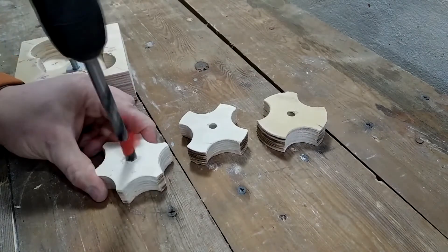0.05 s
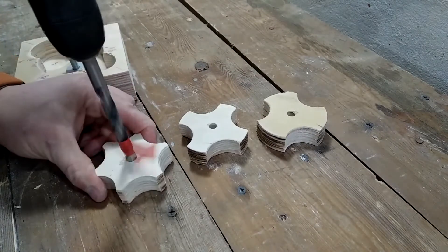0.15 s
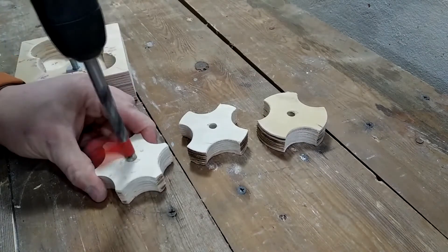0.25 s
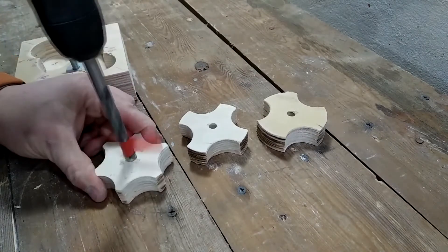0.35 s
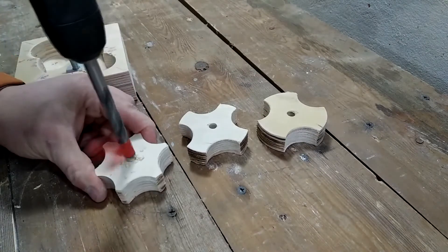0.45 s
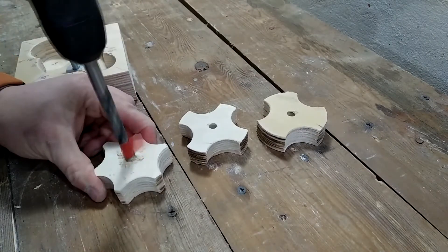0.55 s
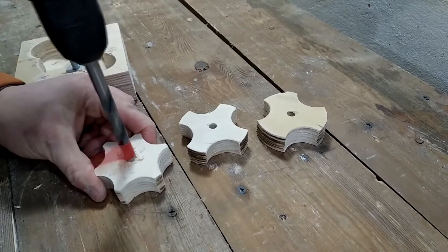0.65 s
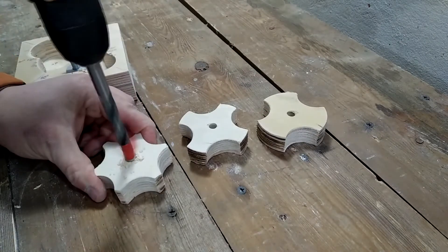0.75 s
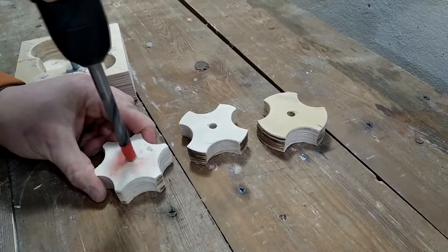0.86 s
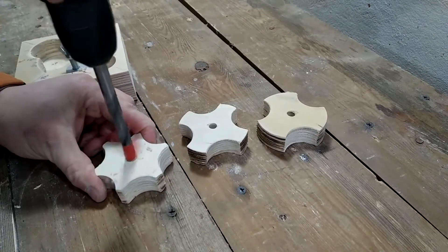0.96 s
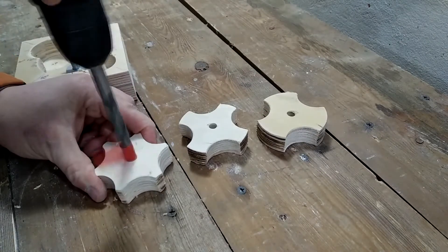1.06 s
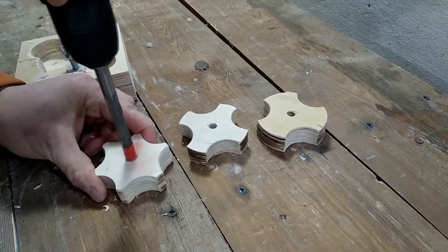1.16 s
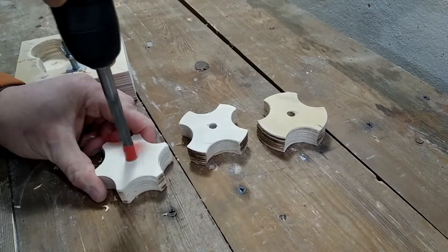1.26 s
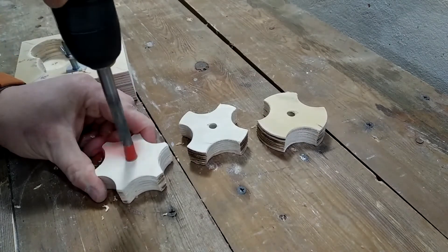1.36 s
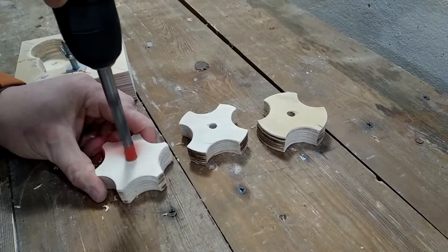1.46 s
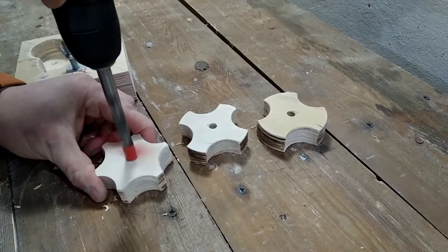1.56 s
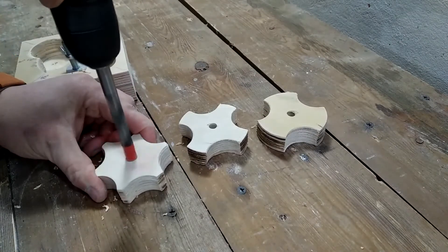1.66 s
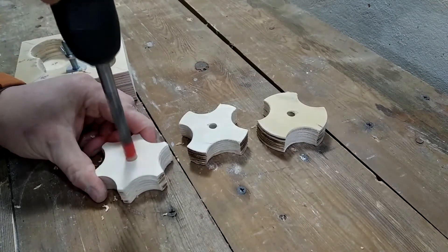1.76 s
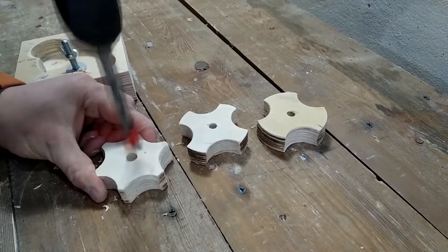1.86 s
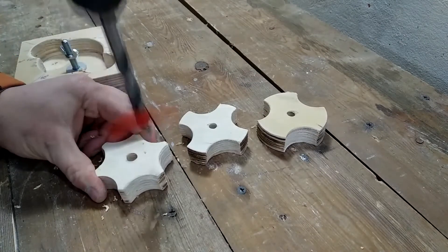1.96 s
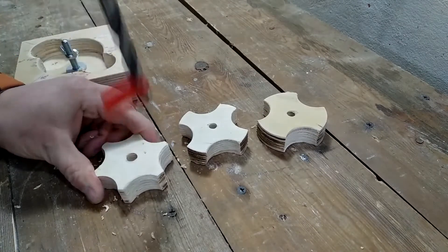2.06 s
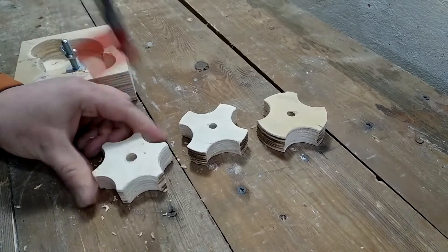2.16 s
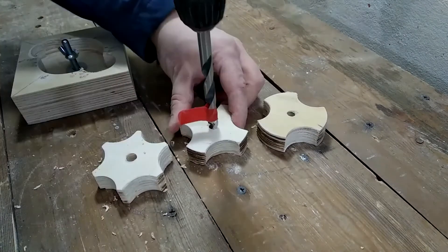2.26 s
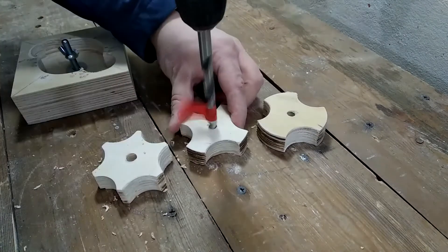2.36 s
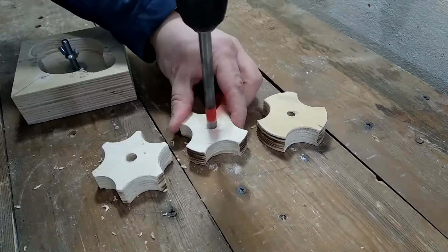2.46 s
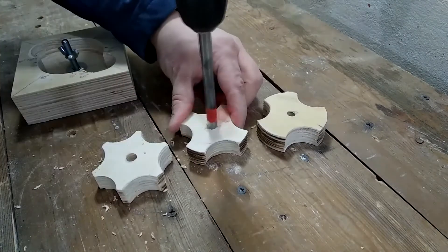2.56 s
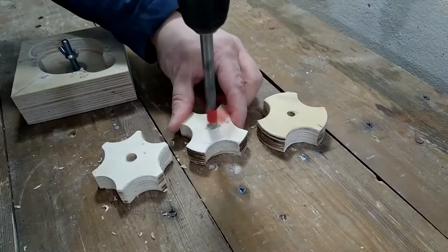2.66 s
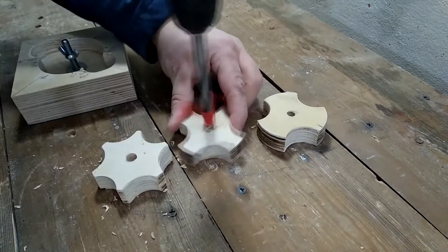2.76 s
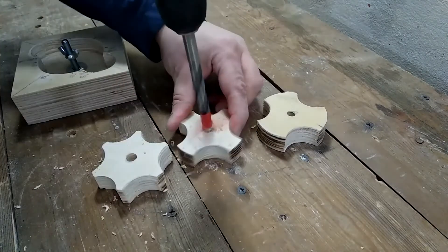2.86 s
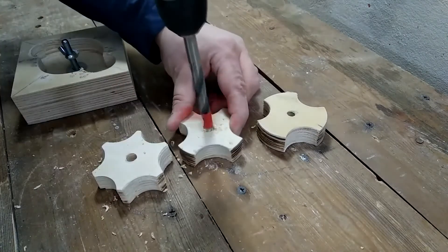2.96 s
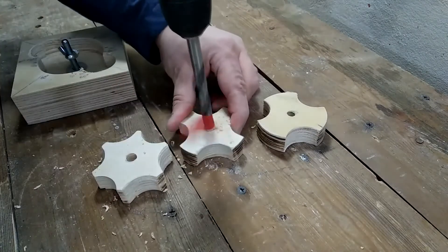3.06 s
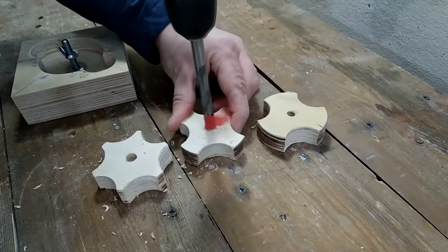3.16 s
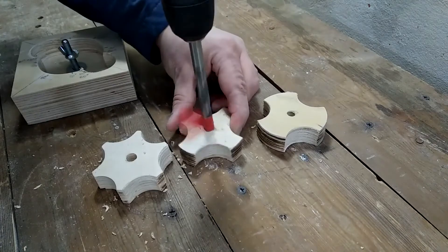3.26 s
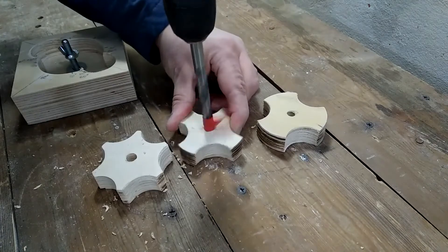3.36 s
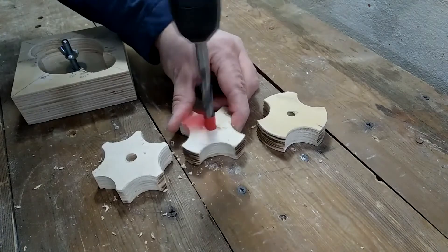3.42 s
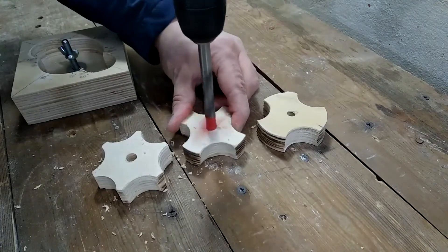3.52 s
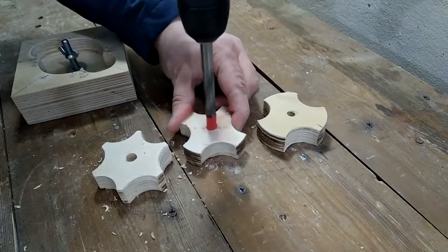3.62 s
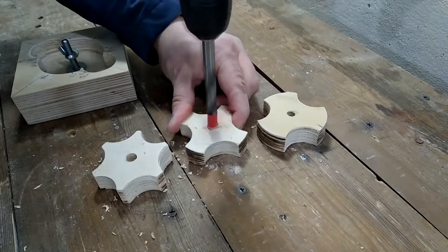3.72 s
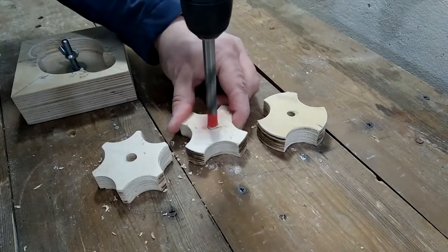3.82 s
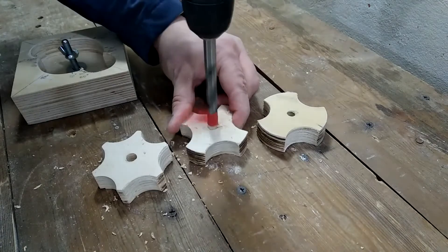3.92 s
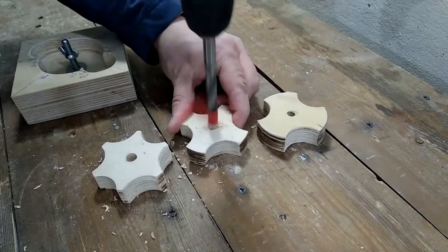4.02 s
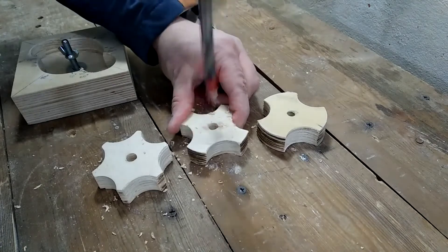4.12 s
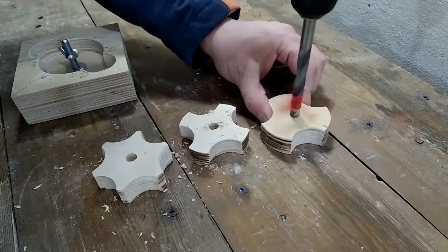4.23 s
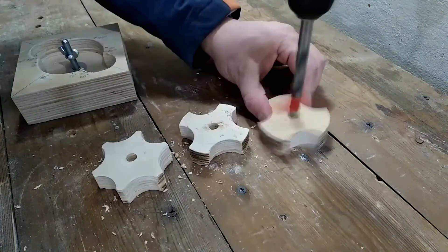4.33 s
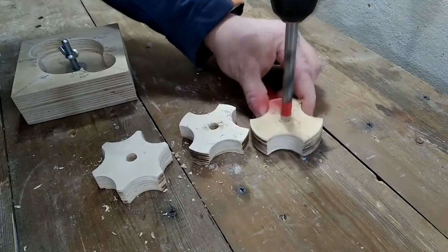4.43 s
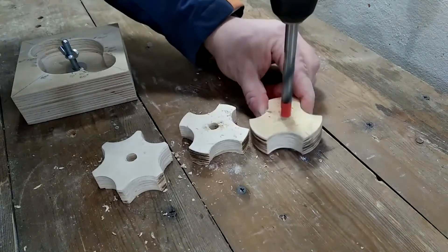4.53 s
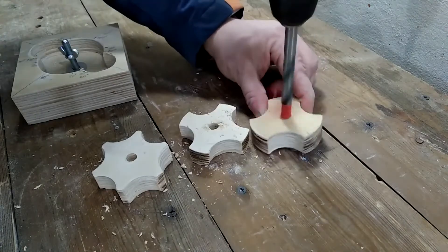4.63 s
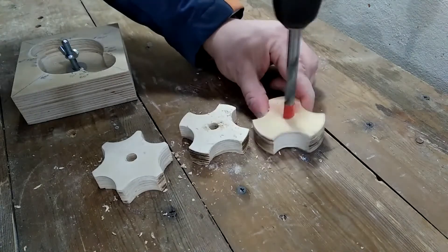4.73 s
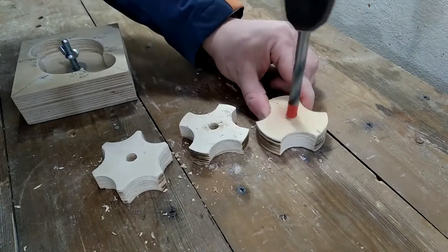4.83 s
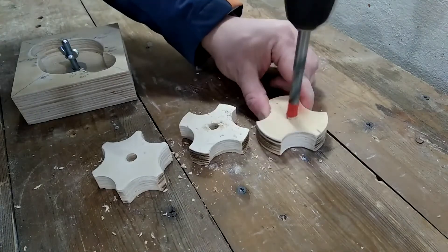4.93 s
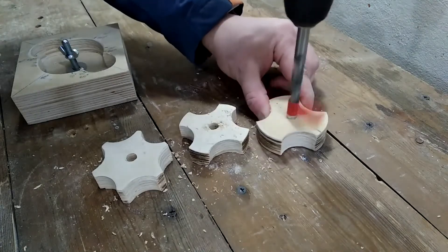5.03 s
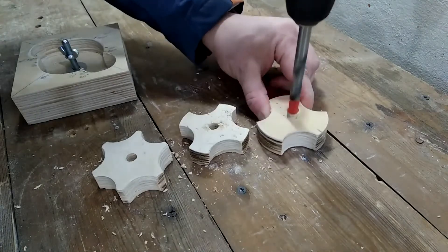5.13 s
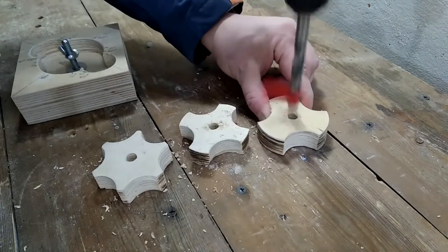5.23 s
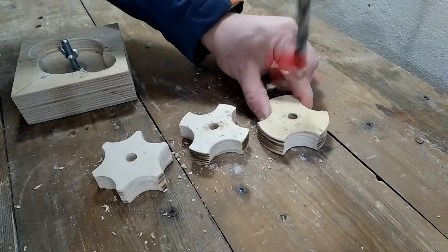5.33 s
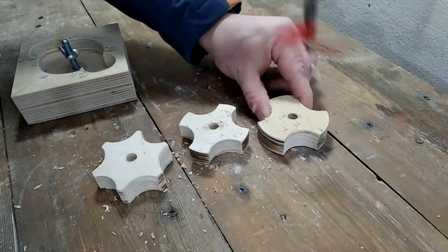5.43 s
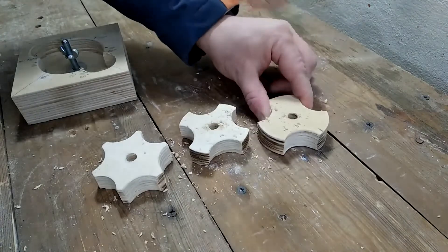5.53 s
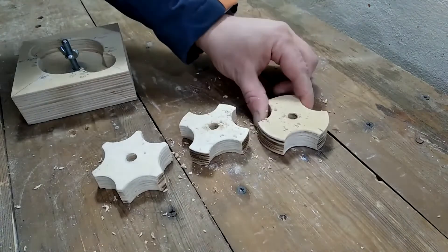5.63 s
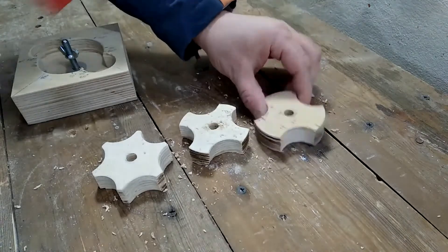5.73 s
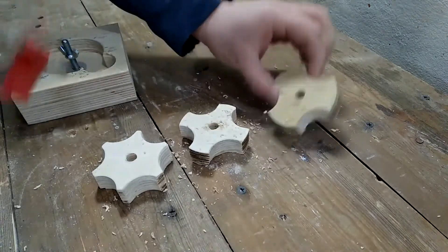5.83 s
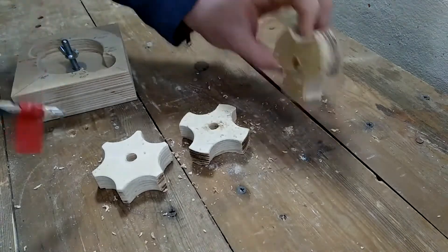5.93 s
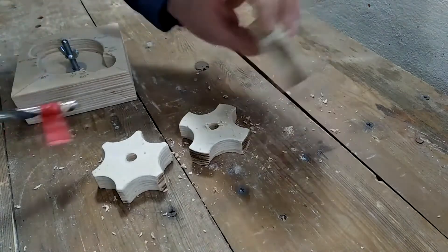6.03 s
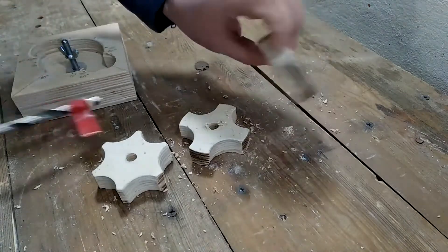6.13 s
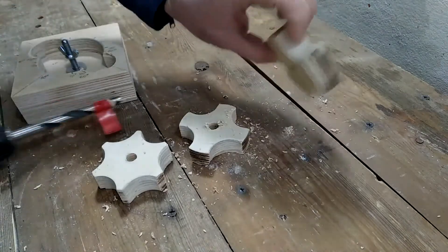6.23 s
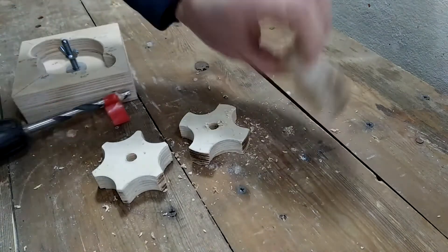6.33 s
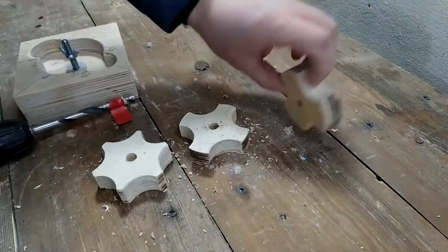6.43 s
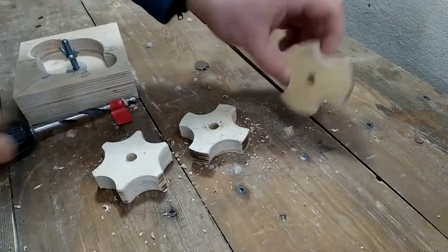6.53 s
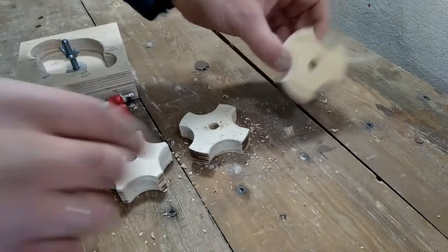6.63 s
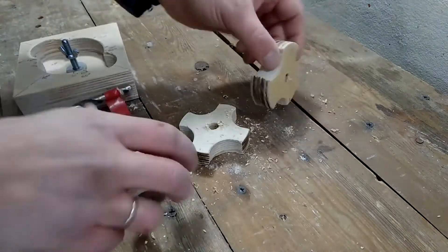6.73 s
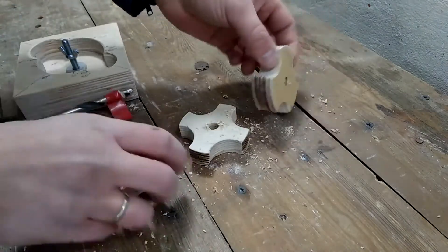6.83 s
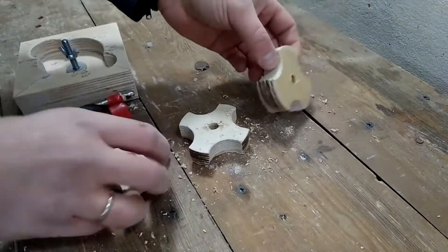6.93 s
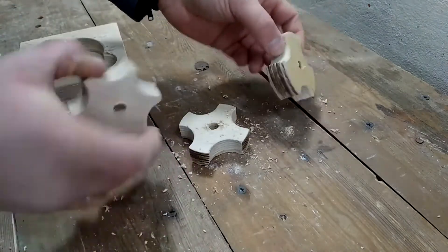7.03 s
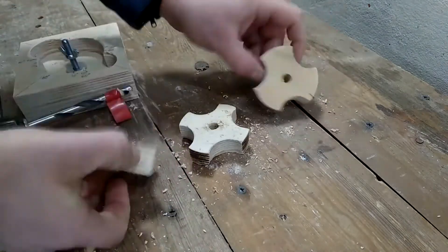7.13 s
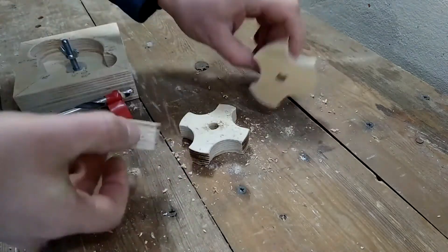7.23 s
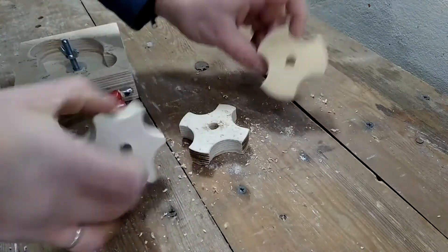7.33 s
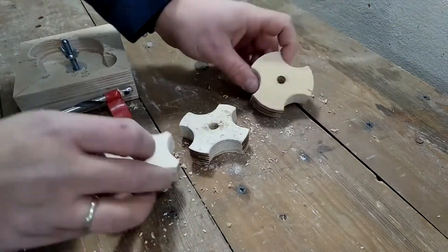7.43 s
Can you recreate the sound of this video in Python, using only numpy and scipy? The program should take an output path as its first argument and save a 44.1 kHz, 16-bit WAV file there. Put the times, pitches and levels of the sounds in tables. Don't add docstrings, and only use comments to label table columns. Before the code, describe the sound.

In a small hard-walled workshop, a cordless drill widens holes in three plywood blanks on a plank bench. Gritty motor hiss, gear whine and creaks come in three bouts with brake clacks; the third is brighter and squeals sharply. Then the drill is set down with a thud and rattle, and blanks knock and rustle on the planks. Close small stereo microphone.

```python
import sys
import numpy as np
from scipy import signal
from scipy.io import wavfile
from scipy.ndimage import uniform_filter1d

SR = 44100
rng = np.random.default_rng(int(sys.argv[2]) if len(sys.argv) > 2 else 0)


def master(y):
    cut = np.clip(np.atleast_2d(y).T, -1, 1)
    pcm = np.round(cut * 32767)
    wavfile.write(sys.argv[1], SR, pcm.astype(np.int16))


def gain_from_db(level_db):
    decades = np.asarray(level_db, float) / 20
    return 10 ** decades


N = 329868

# (frequency [Hz], width [Hz], level [dB])
BENCH = [(131, 12.7, 0), (217, 27, -4), (260, 26, -4.5), (336, 25.5, 2), (458, 16, -13.5), (553, 9.9, 10),
         (610, 11, 1), (749, 33, 5), (928, 68, 0), (980, 23, 3), (1067, 49, 1), (1274, 20, -3.5),
         (1440, 16, -3.5), (1670, 25, -20)]


def evened(x):
    return x / np.sqrt(np.mean(x ** 2) + 1e-20)


def read(points, hz):
    f, value = np.transpose(points)
    return np.interp(np.log(hz + 1), np.log(f + 1), value)


def add(mix, s, sound):
    part = mix[max(round(s * SR), 0):][:len(sound)]
    part += sound[:len(part)]


def unroll(rows):
    s, *columns = np.transpose(rows)
    t = np.arange(s[0], s[-1], 1 / SR)
    return s[0], [np.interp(t, s, c) for c in columns]


def smooth(x, frames, bins):
    return uniform_filter1d(uniform_filter1d(x, size=frames, axis=0), size=bins, axis=1)


def resonate(x, hz, width):
    turn = np.exp(2j * np.pi * np.cumsum(hz * np.ones(len(x))) / SR)
    r = np.exp(-np.pi * width / SR)
    return 2 * (turn * signal.lfilter([1 - r], [1, -r], x / turn)).real


def body(x, modes):
    return sum((-1) ** k * gain_from_db(db) * resonate(x, hz, width) for k, (hz, width, db) in enumerate(modes))


def wobble(count, seconds):
    size = max(round(seconds * SR), 1)
    return evened(uniform_filter1d(uniform_filter1d(rng.standard_normal(count), size), size))


def hiss(count, colour, modes=(), patchy_db=-0.5, streaky_db=1.0, drift=.5, lean=0.016):
    frames, hz = count // 128 + 5, np.fft.rfftfreq(512, 1 / SR)
    a, b, patches, streaks = rng.standard_normal((frames, 257, 4)).T
    patches = evened(smooth(patches, 8, 14))
    streaks = evened(smooth(streaks, 2, 30))
    level_db = read(colour, hz)[:, None] + patchy_db * patches + streaky_db * streaks
    for f, width, db in modes:
        sway, slide = uniform_filter1d(
            uniform_filter1d(rng.standard_normal((frames, 2)), size=28, axis=0), size=12, axis=0).T
        at = f * (1 + lean * evened(slide))
        bump = np.exp(-((hz[:, None] - at) / width) ** 2)
        level_db += db * bump * np.clip(1 + drift * evened(sway), 0, 2.8)
    spectra = (a + 1j * b) * gain_from_db(level_db)
    return evened(signal.istft(spectra, nperseg=512, noverlap=384)[1][:count])


def strands(count, tones_hz, flicker_db=4.0, flicker_s=0.022, wander_hz=42.03):
    out = np.zeros(count)
    for hz in tones_hz:
        turns = np.cumsum(hz + wander_hz * wobble(count, .07)) / SR
        out += gain_from_db(flicker_db * wobble(count, flicker_s)) * np.sin(2 * np.pi * turns)
    return evened(out)


def room_air():
    # (frequency [Hz], density [dB per Hz])
    air_colour = [(24, -70), (40, -5.5), (444, -4), (1850, -15), (4570, -16), (8130, -13.5), (10700, -14),
                  (16000, -15.5)]
    return gain_from_db(-63.5) * hiss(N, air_colour, patchy_db=2.0, streaky_db=2.0)


def drill_bout(rows, hold, colour, modes, planks):
    # (frequency [Hz], width [Hz], level [dB])
    drone_modes = [(660, 146, -3), (977, 260, 5.5), (1230, 560, -1)]
    loose_hz = [560, 700, 823, 998, 1068, 1176, 1325]
    teeth_hz = [1645, 2160, 2542, 2886, 3130, 3540, 4280, 4750, 5570, 6120]
    coast_s, edge_s = .052, 0.0011
    fizz_per_db, slack_db = 0.54, -16
    last, *held = rows[-1]
    s, (hiss_db, grip) = unroll([*rows, (last + coast_s, *held)])
    count = len(hiss_db)
    fizz_db, drone_db, shake_db, easing_db_per_s = hold
    t = np.arange(count) / SR

    grit = gain_from_db(0.13 * wobble(count, 0.00072))
    air = hiss(count, colour, modes, patchy_db=1.1, streaky_db=2.4, drift=.65) * grit
    low = signal.sosfiltfilt(signal.butter(4, 7000, fs=SR, output="sos"), air)
    fizz_db = fizz_db + fizz_per_db * (hiss_db - hiss_db.max()) + 2.45 * wobble(count, 0.02)
    fizz = gain_from_db(fizz_db) * evened(air - low)

    push = rng.standard_normal((2, count)) * gain_from_db(1.6 * wobble(count, 0.014))
    drone = evened(resonate(body(push[0], drone_modes), 1090, 1084)) + gain_from_db(-1.5) * strands(count, loose_hz)
    drone = gain_from_db(drone_db - 4.5 + slack_db * (1 - np.clip(grip, 0, 1))) * drone
    teeth = gain_from_db(-10.5) * strands(count, teeth_hz, flicker_db=2.8, flicker_s=.018, wander_hz=25)
    shake_db = shake_db - 1.5 + easing_db_per_s * t + 2.7 * wobble(count, 0.059)
    shake = gain_from_db(shake_db) * evened(body(push[1], planks))

    mix = evened(low) + teeth + fizz + drone + shake
    throb = gain_from_db(0.94 * wobble(count, 0.013) + 0.39 * wobble(count, 0.011))
    return s, gain_from_db(hiss_db - 2.5) * throb * mix * np.minimum(np.minimum(t, t[::-1]) / edge_s, 1)


def drilling(mix):
    # (time [s], motor effort [dB], grip of the hole on the bit [0-1])
    bouts = [
        [(0.0, -41.5, 1), (0.28, -44.5, 1), (0.32, -39.5, 1), (0.98, -37.5, 0.87), (1.74, -35, 0.78),
         (1.8, -32, 0.66), (2.0, -35, 0.84)],
        [(2.333, -74, .3), (2.345, -51, 0.93), (2.55, -36.5, 0.45), (2.78, -34.5, 0.24), (2.8, -36.5, 0.76),
         (3.62, -36, 0.71), (3.85, -37.5, 0.26), (4.05, -35, 0.19), (4.16, -39.5, 0.44)],
        [(4.217, -50.5, 0.4), (4.255, -42.5, 0.75), (4.4, -32, 0.65), (4.76, -33.5, 0.74), (5.0, -35.5, 0.38),
         (5.3, -44.5, 0.6), (5.46, -39.5, 0.63)],
    ]
    # (brush fizz [dB], full-grip drone [dB], first shake re hiss [dB], shake easing [dB per s])
    holds = [
        (0.5, 3, 0.5, -8),
        (-0.5, 4.5, -3.5, -5.5),
        (2.5, -2.5, -2, -13),
    ]
    # (frequency [Hz], density [dB per Hz])
    hiss_colours = [
        [(820, -61), (1400, -9.5), (2920, -6), (3690, -6), (4080, -7), (5110, -9.5), (7010, -9), (16000, -16)],
        [(820, -27), (1400, -12.5), (2580, -6), (3070, -7), (3840, -7.5), (7450, -10), (10300, -14),
         (16000, -17.5)],
        [(820, -68), (1400, -10), (2100, -3), (2530, 0), (4300, -2.5), (7370, -1.5), (11900, -1.5),
         (16000, -11.5)],
    ]
    # (frequency [Hz], width [Hz], level [dB])
    housings = [
        [(2570, 110, 3), (2870, 150, 2.5), (4050, 110, 2), (7260, 90, 3), (1450, 80, -8), (2360, 90, -10),
         (3720, 100, -9), (5040, 120, -11), (6380, 90, -7)],
        [(3040, 140, 3), (5200, 110, 3), (6050, 100, 3), (7260, 110, 4), (2600, 70, -4), (3760, 110, -5),
         (4930, 90, -6), (6330, 80, -5), (10300, 200, -5)],
        [(1600, 150, 3), (3500, 110, 1.5), (5390, 60, 4), (7270, 130, 4), (2250, 70, -4), (3320, 80, -6),
         (4550, 100, -6), (5230, 80, -6), (5700, 80, -6)],
    ]
    # (frequency [Hz], width [Hz], level [dB])
    shakes = [
        [(134, 35, -1.5), (223, 8.1, -7.5), (315.5, 51, -1.5), (441.5, 29, -2), (565, 30, 2.5)],
        [(119, 38, -6.5), (264, 16, -1), (325, 185, -11), (424.6, 14, -3), (546, 47, -1.5)],
        [(124, 33, 0.5), (258.6, 19, 5), (326, 140, -4), (470, 10, -11), (547, 48, 8)],
    ]
    for bout in zip(bouts, holds, hiss_colours, housings, shakes):
        add(mix, *drill_bout(*bout))


def walls(x):
    # (frequency [Hz], t60 [s])
    decay = [(120, 0.98), (500, 0.25), (1500, 0.53), (4000, 0.52), (12000, 0.35)]
    taps = np.zeros(SR // 2)
    at = np.arange(300, SR // 2 - 20, 20)
    taps[at + rng.integers(0, 20, at.shape)] = rng.choice([-1., 1.], at.shape)
    hz, t, z = signal.stft(taps, SR, nperseg=256)
    tail = signal.istft(z * gain_from_db(-60 * t / read(decay, hz)[:, None]), SR, nperseg=256)[1]
    return signal.fftconvolve(x, tail / np.linalg.norm(tail))[:N]


def streaks(mix):
    # (time [s], length [s], from [Hz], to [Hz], level [dB])
    rubs = [(0.037, 0.181, 3570, 3470, -50), (0.117, 0.077, 4780, 4760, -49.5),
            (0.294, 0.16, 3460, 3530, -50), (0.312, 0.097, 4570, 4500, -52.0),
            (0.33, 0.061, 5600, 6029.0, -48), (0.346, 0.16, 2580, 2450, -48),
            (0.358, 0.16, 2955.0, 2850, -49), (0.369, 0.23, 4380, 4420, -47.5),
            (0.485, 0.16, 5593.0, 5390, -62), (0.614, 0.13, 4430, 4470, -52.6),
            (0.622, 0.1, 7204.0, 7254.0, -60.5), (0.657, 0.17, 4000, 4010, -43),
            (0.716, 0.161, 5700, 5570, -60), (0.865, 0.077, 4030, 3970, -41),
            (0.955, 0.17, 3950, 4170, -43), (1.107, 0.078, 5502.0, 5717.0, -47),
            (1.127, 0.095, 6869.0, 6870, -47.5), (1.204, 0.1, 4043.0, 4180, -44),
            (1.331, 0.089, 7250, 7200, -42), (1.378, 0.091, 4040, 4100, -41.5),
            (1.571, 0.16, 2900, 2861.0, -44.5), (1.736, 0.115, 5486.0, 5577.0, -48.3),
            (1.754, 0.078, 2900, 2920, -49), (2.392, 0.098, 2740, 2860, -52),
            (2.4, 0.19, 5216.0, 5400, -60), (2.47, 0.11, 3970, 4091.0, -54.5),
            (2.48, 0.1, 6450, 6368.0, -48), (2.65, 0.123, 4041.0, 3988.0, -50.3),
            (2.778, 0.15, 3070, 3010, -43.5), (2.81, 0.054, 7280, 7260, -42),
            (2.825, 0.067, 5146.0, 5080, -41), (3.083, 0.12, 5599.0, 5530, -59),
            (3.292, 0.12, 2826, 3000, -44), (3.359, 0.2, 4140, 4050, -49.6),
            (3.741, 0.24, 2930, 3140, -43.5), (3.787, 0.094, 4370, 4250, -40),
            (3.977, 0.15, 3130, 3190, -44), (4.292, 0.24, 5430, 5420, -41),
            (5.219, 0.14, 3460, 3460, -49.7), (5.354, 0.088, 2950, 2880, -49)]
    width_hz, trim_db = 45, -3
    for s, seconds, from_hz, to_hz, db in rubs:
        hz = np.geomspace(from_hz, to_hz, round(seconds * SR))
        count = len(hz)
        hz = hz * (1 + .008 * wobble(count, .012))
        tone = resonate(rng.standard_normal(count), hz, width_hz)
        tone = evened(resonate(tone, hz, 2 * width_hz))
        swell = gain_from_db(db + trim_db + 2.5 * wobble(count, .008)) * signal.windows.tukey(count, .4)
        add(mix, s, swell * tone)


def clacks(mix):
    # (time [s], peak [dB], housing ring [Hz], rattle re peak [dB], rise [s])
    catches = [(.366, -44, 700, 14, 0.0086), (2.011, -19.5, 823, -12, 0.0071),
               (2.0205, -20.5, 743, -5, 0.0013), (2.026, -35.5, 850, 10, 0.0057),
               (2.0395, -22.5, 840, 2, 0.0024), (2.357, -56, 1150, -26, .004),
               (2.382, -37.5, 1050, 0, 0.0031), (2.431, -41, 623, -1, 0.0072), (5.477, -37, 696, 5, 0.0041),
               (5.486, -33.5, 1343, 0.5, 0.008), (5.512, -41, 333, 5.5, 0.0062),
               (5.514, -36, 700, 0, 0.006)]
    # (frequency [Hz], width [Hz], level [dB])
    rattle_modes = [(310, 16, 8), (660, 540, 0), (1370, 830, 0), (2040, 560, 0), (2870, 390, -0.5),
                    (6200, 990, -2), (9200, 10000, -17)]
    t60_s, sag_per_s = 0.03, 4.6
    t = np.arange(4000) / SR
    for s, db, hz, rattle_db, rise_s in catches:
        fall = np.minimum(t / rise_s, 1) * gain_from_db(-60 * np.maximum(t - rise_s, 0) / t60_s)
        rattle = evened(body(rng.standard_normal(len(t)), rattle_modes))
        ring = np.sin(2 * np.pi * hz * t * (1 - sag_per_s * np.minimum(t, .03)))
        add(mix, s - .001, gain_from_db(db) * fall * (ring + gain_from_db(rattle_db) * rattle))


def creaks(mix):
    # (time [s], length [s], from [Hz], to [Hz], level
    # [dB])
    slips = [(0.601, 0.22, 571, 723, -45.5), (0.78, 0.074, 642, 560, -41.5), (0.859, 0.098, 700, 590, -42),
             (1.03, 0.14, 768, 922, -43), (1.169, 0.14, 930, 1087, -40.5), (1.33, 0.085, 1112, 1250, -40),
             (1.733, 0.064, 560, 700, -36), (1.9, 0.14, 908, 773, -48), (2.511, 0.047, 547, 543, -47.5),
             (2.601, 0.26, 560, 530, -46.5), (2.786, 0.047, 1052, 960, -37),
             (2.811, 0.045, 977, 740, -40.5), (2.838, 0.11, 743, 727, -43.5), (2.978, .11, 618, 804, -46),
             (3.089, 0.21, 890, 947, -41), (3.26, 0.22, 850, 700, -47), (3.23, 0.17, 1130, 1044, -44.5),
             (3.462, 0.15, 866, 1188, -40), (3.92, 0.25, 830, 834, -51), (4.367, 0.09, 264, 250, -40.5),
             (4.479, 0.047, 970, 1010, -42), (4.548, .07, 1150, 1010, -47), (4.37, 0.14, 560, 545, -50),
             (4.58, .09, 510, 499, -47.5), (4.597, .24, 992, 964, -44.5), (4.702, 0.16, 560, 547, -39.5),
             (4.864, 0.091, 1080, 1145, -45), (5, 0.047, 1007, 860, -51), (5.079, 0.088, 453, 364, -53),
             (5.157, 0.03, 1030, 890, -50.5), (5.207, 0.041, 912, 926, -47),
             (5.351, 0.059, 965, 1050, -51.5), (2.5, 0.086, 157, 147, -47), (2.531, 0.038, 299, 310, -43),
             (4.45, 0.41, 1530, 1480, -47.5), (2.035, .02, 3200, 2900, -35.5),
               (2.07, 0.11, 2950, 2940, -54.5), (6.78, .12, 130, 127, -64.5), (5.2, 0.216, 3480, 3480, -52),
               (4.301, 0.35, 560, 550, -46.5), (4.88, 0.12, 560, 550, -48.5),
               (.715, 0.047, 3500, 3500, -45), (0.881, .04, 4750, 4750, -41.5),
               (1.302, 0.055, 4380, 4380, -44), (2.802, .09, 3650, 3660, -43.5),
               (3.15, 0.051, 3580, 3640, -42.5), (3.2, 0.033, 4760, 4760, -42),
               (3.54, 0.13, 3300, 3720, -44.5), (3.68, 0.093, 3680, 4020, -45),
               (4.41, .08, 3480, 3520, -42), (4.5, .07, 3560, 3500, -38.5), (4.612, 0.043, 3560, 3500, -43),
               (4.632, 0.055, 5400, 5380, -40), (4.783, 0.086, 3450, 3950, -43)]
    for s, seconds, from_hz, to_hz, db in slips:
        hz = np.geomspace(from_hz, to_hz, round(seconds * SR))
        count = len(hz)
        turns = np.cumsum(hz * (1 + 0.011 * wobble(count, 0.0078))) / SR
        tone = np.sin(2 * np.pi * turns) + 0.25 * np.sin(4 * np.pi * turns)
        swell = gain_from_db(db + 2 + 3.2 * wobble(count, 0.01)) * signal.windows.tukey(count, .5)
        add(mix, s, swell * tone)


def shaft(mix):
    # (time [s], length [s], from [turns per s], to [turns per s], level [dB])
    run_ups = [
        (1.2, .36, 298, 468, -43),
        (1.77, .27, 225, 290, -52),
        (5.14, .33, 280, 450, -52),
    ]
    run_up = 600
    boom_hz, boom_width_hz, boom_db = 950, 200, 9
    for s, seconds, from_hz, to_hz, db in run_ups:
        t = np.arange(0, seconds, 1 / SR)
        way = np.sin(np.pi / 2 * np.minimum(t * run_up / (to_hz - from_hz), 1)) ** 2
        hz = from_hz + (to_hz - from_hz) * way
        angle = 2 * np.pi * np.cumsum(hz) / SR
        tone = np.zeros(len(t))
        for k, order_db in enumerate([0, -6, -9, -7], start=1):
            lift_db = boom_db * np.exp(-((k * hz - boom_hz) / boom_width_hz) ** 2)
            level_db = order_db - 11 * (k - 1) * (1.5 - way) + lift_db + 1.4 * wobble(len(t), 0.043)
            tone += gain_from_db(level_db) * np.sin(k * angle)
        add(mix, s, gain_from_db(db - 8.6 * (1 - way)) * tone * signal.windows.tukey(len(t), .2))


def squeals(mix):
    # (time [s], peak [dB], frequency [Hz], length [s])
    bursts = [(4.401, -21, 5450, 0.025), (4.43, -37, 5390, 0.02), (4.46, -15, 4760, 0.0089),
              (4.462, -23, 4650, 0.02), (4.476, -27, 4760, 0.016), (4.501, -23, 4880, 0.016),
              (4.5154, -17, 4870, 0.011), (4.536, -21.5, 4830, 0.024), (4.578, -23.5, 4860, 0.018),
              (4.593, -17.5, 4750, 0.017), (4.621, -17.5, 4720, 0.016), (4.636, -18, 4710, 0.015),
              (4.666, -25, 4680, 0.052), (4.7, -27, 4870, 0.053), (4.723, -18, 4840, 0.018),
              (4.764, -24.5, 4750, 0.024), (4.789, -35, 4750, 0.019)]
    for s, db, hz, seconds in bursts:
        count = round(2 * seconds * SR)
        turns = np.cumsum(hz * (1 + 0.008 * wobble(count, 0.001))) / SR
        swell = np.hanning(count) * gain_from_db(5.4 * wobble(count, 0.00062))
        rasp = gain_from_db(-6.5) * evened(resonate(rng.standard_normal(count), 6300, 6400))
        add(mix, s - .004, gain_from_db(db - 8.5) * swell * (np.sin(2 * np.pi * turns) + rasp))


def strike(mix, rows, planks):
    # (frequency [Hz], width [Hz], level [dB])
    clatter_modes = [(1400, 370, 12), (2350, 1400, -0.5), (5500, 3200, -9.5), (2880, 400, 0.5)]
    # (frequency [Hz], width [Hz], level [dB])
    jingle_modes = [(3970, 330, 7), (7200, 4100, -4), (12200, 1300, -23)]
    hardest_db, hard_ms, softest_ms, softer_per_db = -4.5, 0.59, 1.43, 0.4
    t = np.arange(7000) / SR
    bounces = np.zeros(300)
    bounces[::60] = [0.079, 0.019, 0.38, 0.9, -0.43]
    for s, db, hz, clatter_db, jingle_db in rows:
        contact_ms = min(hard_ms * gain_from_db(softer_per_db * (hardest_db - db)), softest_ms)
        push = np.sin(np.pi * np.clip(t * 1000 / contact_ms, 0, 1)) ** 2
        push = np.convolve(push, bounces)[:len(t)]
        spot = [(f, width, level + rng.standard_normal()) for f, width, level in planks]
        ring = body(push, spot) + gain_from_db(5.5) * resonate(push, hz, 125)
        jumps = rng.standard_normal(len(t))
        loose = gain_from_db(clatter_db - 60 * t / 0.14) * evened(body(jumps, clatter_modes))
        loose += gain_from_db(jingle_db - 60 * t / 0.076) * evened(body(jumps, jingle_modes))
        sound = ring / abs(ring).max() + loose * np.minimum(t / .007, 1)
        fade = np.minimum((len(t) / SR - t) / .03, 1)
        add(mix, s - .003, gain_from_db(db) * sound * fade)


def knocks(mix):
    # (time [s], peak [dB], piece ring [Hz], clatter re peak [dB], jingle re peak [dB])
    blows = [(5.781, -40.5, 548, -26, -27), (5.798, -50, 530, -27, -38), (6.429, -17, 610, -27, -21),
             (6.437, -4.5, 573, -25, -30), (6.459, -16, 650, -20, -14.5), (6.469, -27, 660, -41, -40),
             (6.512, -19, 530, -18.5, -18.5), (6.967, -48, 325, -34, -41), (7.005, -56.5, 560, -25, -35),
             (7.171, -34.5, 1130, -16, -36), (7.18, -18, 626, -30.5, -32), (7.183, -29.5, 1040, -13.5, -30),
             (7.199, -35, 560, -36, -42), (7.435, -68, 600, -28, -35), (7.445, -28, 483, -38, -46)]
    strike(mix, blows, BENCH)


def hands(mix):
    # (time [s], length [s], rustle [dB], rub re rustle [dB])
    moves = [
        (5.797, 0.084, -61, -2),
        (5.897, 0.079, -54, -11),
        (5.954, 0.17, -54, -8),
        (6.491, 0.33, -56.5, -1),
        (6.85, 0.16, -61.5, -12.5),
        (7.027, 0.09, -60.5, -22),
        (7.195, 0.062, -64, -5),
    ]
    # (frequency [Hz], density [dB per Hz])
    rustle_colour = [(880, -62), (1500, -19.5), (2460, -8), (6180, -9.5), (9470, -9), (14600, -10.5),
                     (16000, -15)]
    for s, seconds, rustle_db, rub_db in moves:
        count = round(seconds * SR)
        rub = evened(body(rng.standard_normal(count) * gain_from_db(3 * wobble(count, .006)), BENCH))
        strokes = gain_from_db(1.5 * wobble(count, .015))
        rustle = strokes * hiss(count, rustle_colour, patchy_db=1.5, streaky_db=2.4)
        add(mix, s, gain_from_db(rustle_db) * (rustle + gain_from_db(rub_db) * rub) * signal.windows.tukey(count, .7))


def setdown(mix):
    # (time [s], peak [dB], piece ring [Hz], clatter re peak [dB], jingle re peak [dB])
    landings = [
        (6.341, -42, 244, -7, -57.5),
        (6.349, -19.5, 213, -19.5, -14.5),
        (6.354, -18, 990, -19, -19),
        (6.369, -24, 595, -17.5, -41),
        (6.384, -20.5, 590, -20.5, -28.5),
        (6.412, -22, 210, -16, -53.5),
    ]
    # (frequency [Hz], width [Hz], level [dB])
    loaded = [(128, 9.6, 2), (210, 10, 3), (337, 19, -13.5), (483, 6.4, 8.5), (604.2, 8.7, 6.5),
              (778, 16, -17), (960, 16, 9), (977, 33, 8), (1080, 30, -2), (1510, 20, -10.5),
              (1657, 30, -15.5)]
    strike(mix, landings, loaded)


def bench_echo(mix):
    # (time [s], length [s])
    free_spells = [
        (2.5, .3),
        (3.95, .27),
    ]
    free = np.zeros(N)
    for s, seconds in free_spells:
        add(free, s, signal.windows.tukey(round(seconds * SR), .5))
    return mix - free * resonate(mix, 3740, 420)


def scene():
    # (time [s], fade [s])
    changes = [
        (2.252, 0.025),
        (4.216, 0.0033),
        (6.802, 0.0048),
    ]
    room_db = [-14.5, -10, -8, -7.5]
    near = np.zeros(N)
    for source in drilling, streaks, clacks, creaks, shaft, squeals, knocks, hands, setdown:
        source(near)
    t = np.arange(N) / SR
    take = np.searchsorted([s for s, _ in changes], t)
    wet = np.zeros(N)
    for k, db in enumerate(room_db):
        wet += gain_from_db(db) * walls(near * (take == k)) * (take == k)
    mix = bench_echo(near + wet + room_air())
    for s, fade in changes:
        mix = mix * np.clip(.3 + abs(t - s) / fade, 0, 1)
    return np.array([mix, mix])


def thinned(x):
    hz, t, z = signal.stft(x, SR, nperseg=1024, noverlap=768)
    power = uniform_filter1d(uniform_filter1d(abs(z) ** 2, size=9, axis=1), size=3, axis=0)
    lasting_db = 10 * np.log10(power + 1e-16)
    under_db = lasting_db - uniform_filter1d(lasting_db, size=25, axis=0)
    need = evened(smooth(rng.standard_normal(z.shape[::-1]), 18, 4).T)
    limit = np.interp(hz, [1200, 2200, 11500, 13000], [4, 2.1, 1.8, 1.0])[:, None]
    empty = need - .35 * under_db > limit
    weak_db = np.interp(hz, [900, 1800, 11500, 13000], [-18, -3, -3, -1])[:, None]
    empty |= abs(z) < gain_from_db(weak_db) * uniform_filter1d(abs(z), size=16, axis=0)
    return signal.istft(z * gain_from_db(.2 * under_db - 30 * empty), SR, nperseg=1024, noverlap=768)[1][:N]


def side_of(mid):
    # (frequency [Hz], side re mid [dB])
    width_curve = [(60, -53), (4250, -50), (4700, -1), (6400, -2), (9800, 1), (15000, -0.5)]
    # (from [s], to [s], from [Hz], to [Hz], side re mid [dB])
    lulls = [
        (2.084, 2.37, 60, 4530, -8),
        (5.715, 6.12, 60, 1810, -8.5),
        (6.12, 6.345, 60, 4500, -3),
        (6.34, 6.37, 650, 4500, -19),
        (6.8, 7.165, 60, 4500, -5),
        (7.165, 7.22, 250, 1300, -18),
        (7.304, 7.48, 800, 4500, -3),
        (7.38, 7.44, 60, 800, -14),
        (7.437, 7.48, 250, 800, -15),
    ]
    hz, t, z = signal.stft(mid, SR, nperseg=1024)
    width_db = read(width_curve, hz)[:, None] + 0 * t
    for start, end, from_hz, to_hz, db in lulls:
        kept = ((hz > from_hz) & (hz < to_hz))[:, None] & (t > start) & (t < end)
        width_db = np.where(kept, db, width_db)
    scramble = np.exp(2j * np.pi * rng.random(z.shape))
    return signal.istft(z * scramble * gain_from_db(width_db), SR, nperseg=1024)[1][:N]


def band_limit(x):
    return signal.sosfilt(signal.butter(12, 16190, fs=SR, output="sos"), x)


def record(dry):
    mid = signal.sosfilt(signal.butter(6, 100, "high", fs=SR, output="sos"), thinned(dry[0]))
    mid = mid + gain_from_db(-31) * dry[0]
    band = signal.firwin(401, 15700, window=("kaiser", 7), fs=SR)
    mid = signal.oaconvolve(mid, band, "same")
    side = side_of(mid)
    return band_limit(np.array([mid + side, mid - side]))


dry = scene()
out = record(dry)
master(out)
```